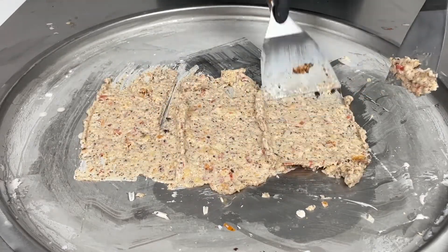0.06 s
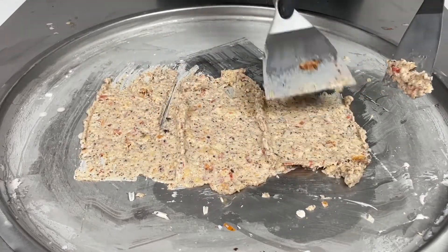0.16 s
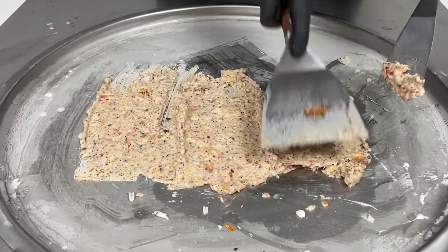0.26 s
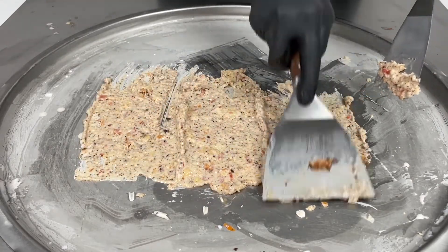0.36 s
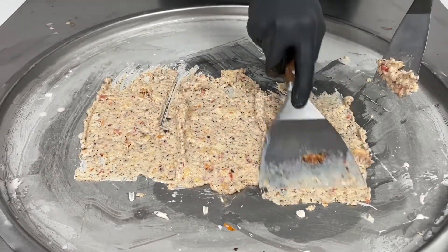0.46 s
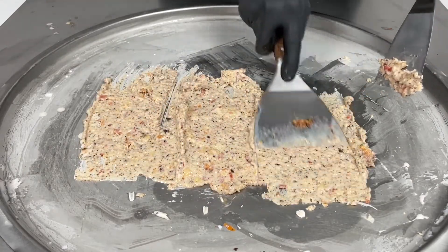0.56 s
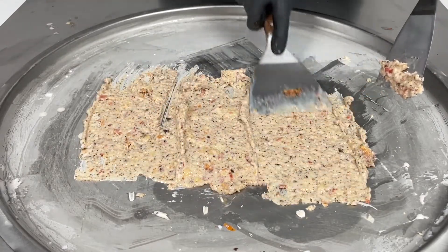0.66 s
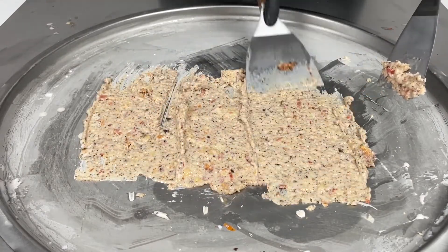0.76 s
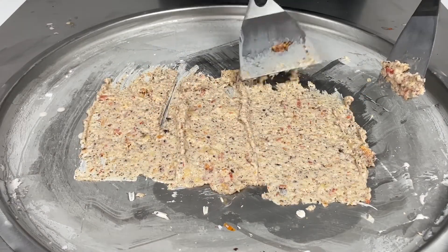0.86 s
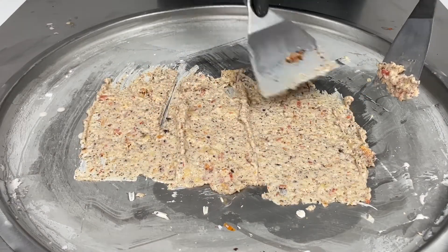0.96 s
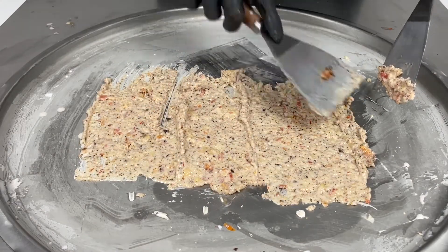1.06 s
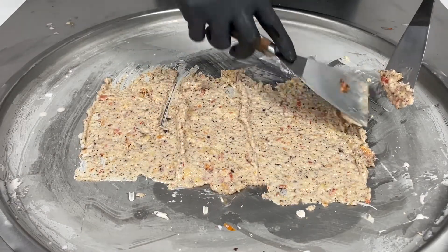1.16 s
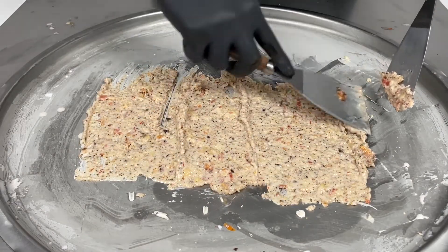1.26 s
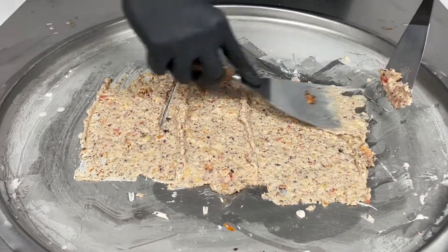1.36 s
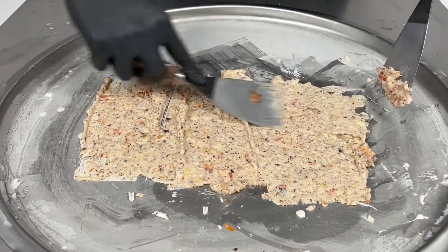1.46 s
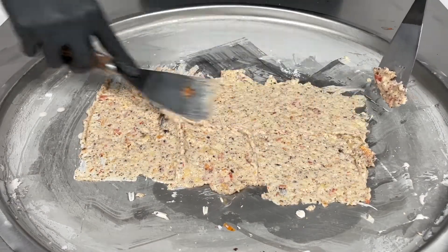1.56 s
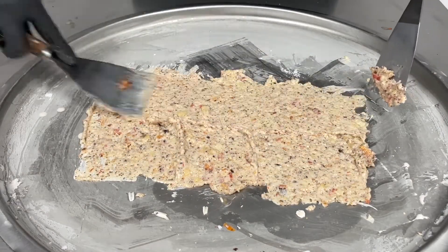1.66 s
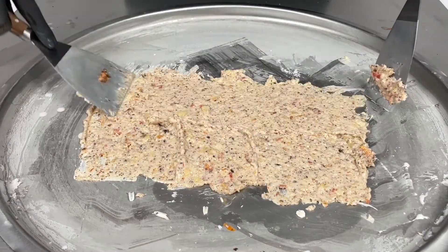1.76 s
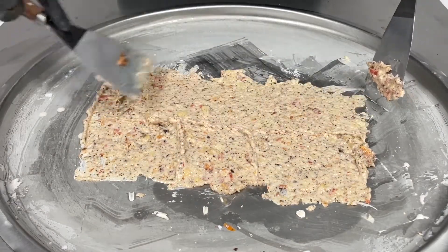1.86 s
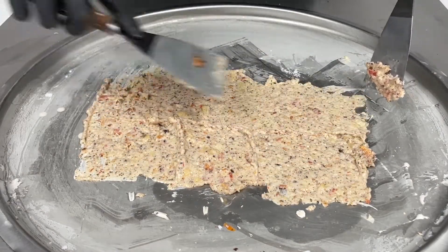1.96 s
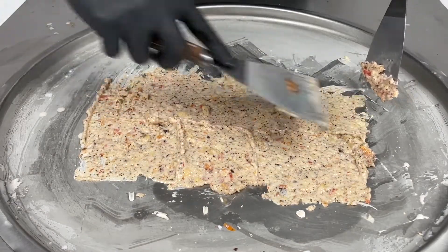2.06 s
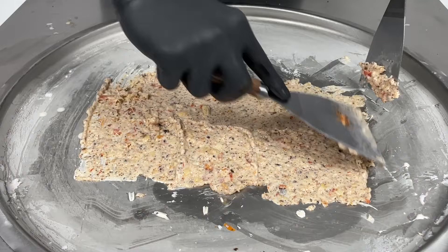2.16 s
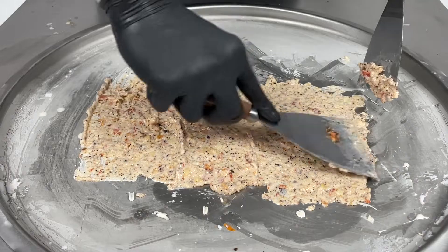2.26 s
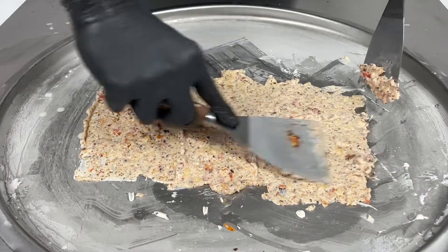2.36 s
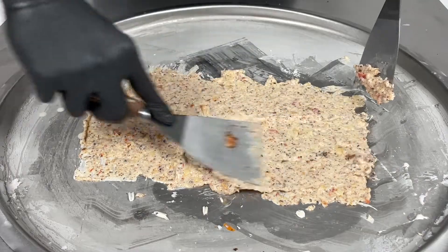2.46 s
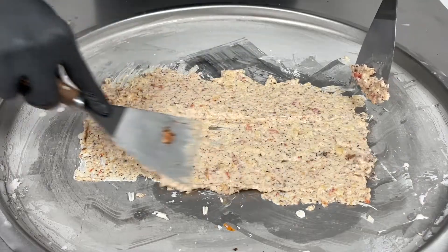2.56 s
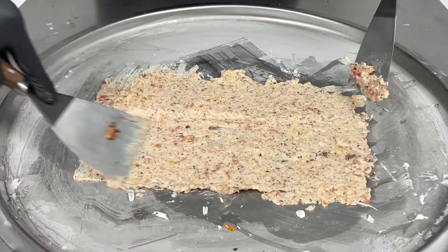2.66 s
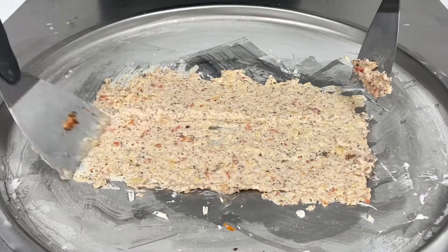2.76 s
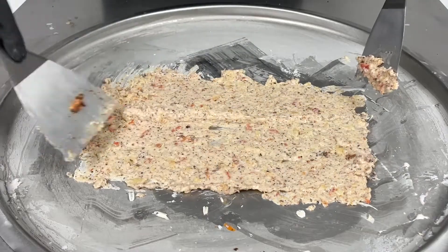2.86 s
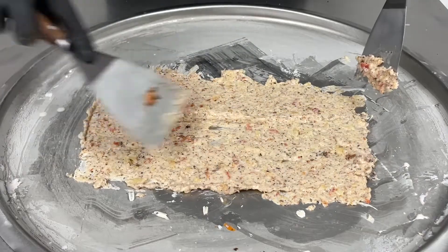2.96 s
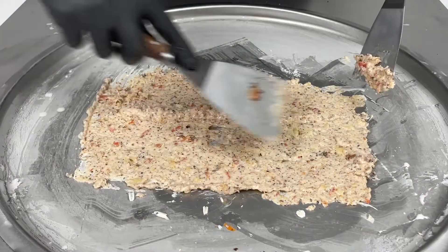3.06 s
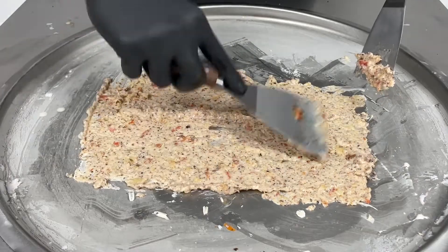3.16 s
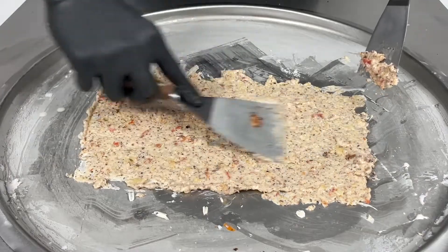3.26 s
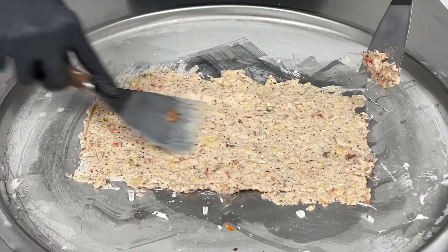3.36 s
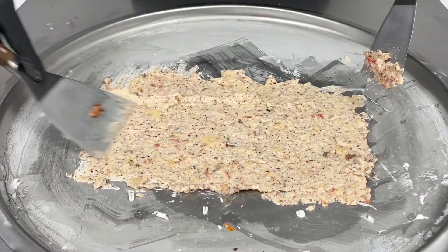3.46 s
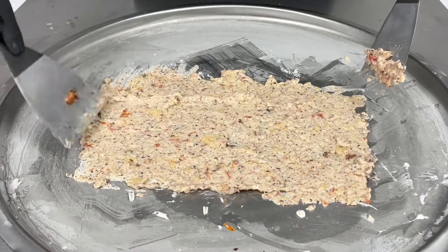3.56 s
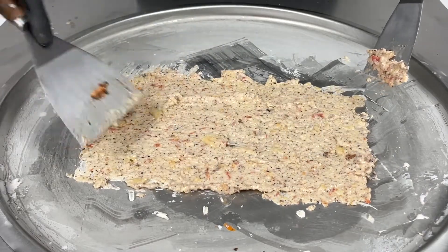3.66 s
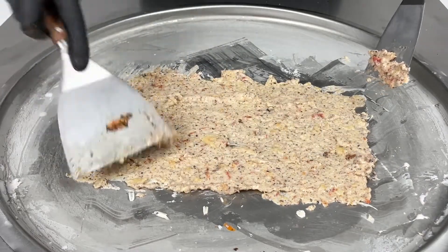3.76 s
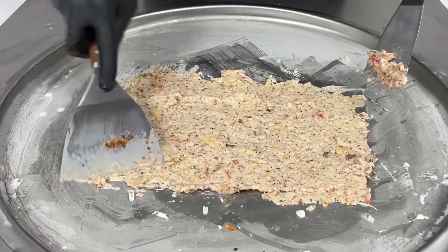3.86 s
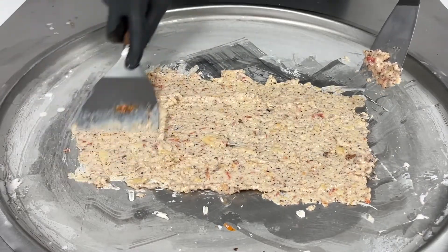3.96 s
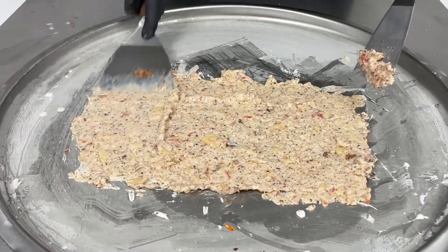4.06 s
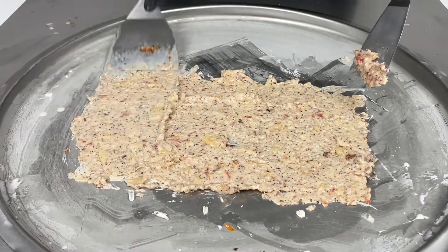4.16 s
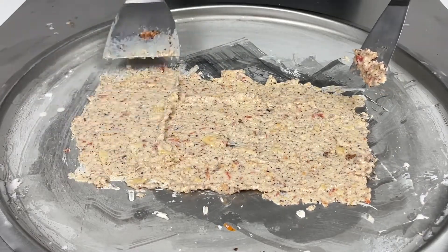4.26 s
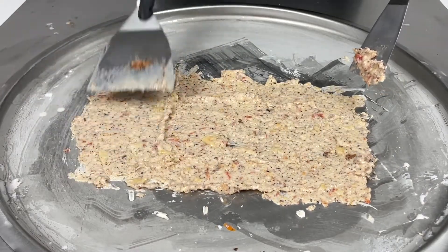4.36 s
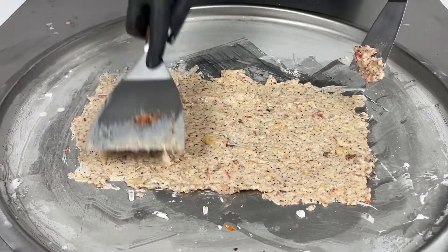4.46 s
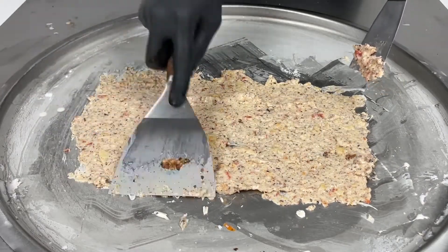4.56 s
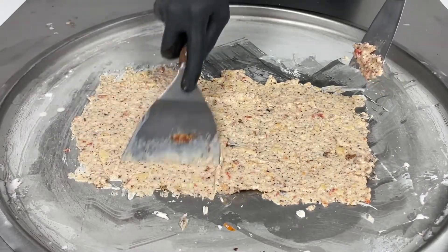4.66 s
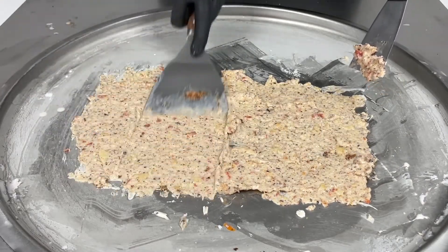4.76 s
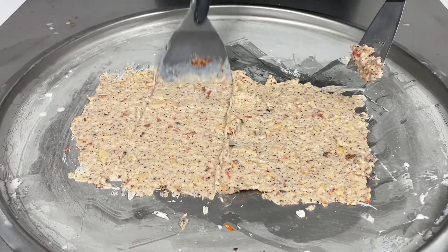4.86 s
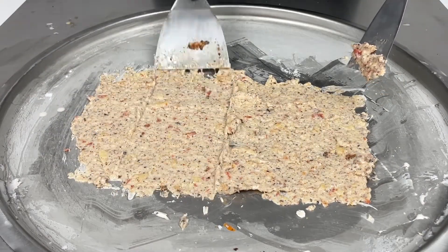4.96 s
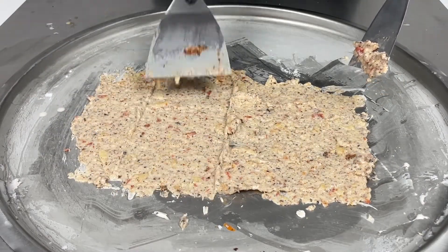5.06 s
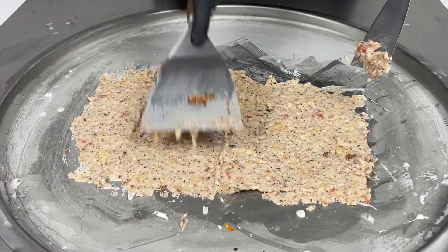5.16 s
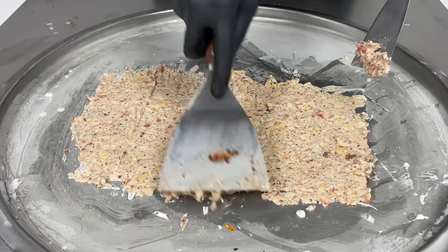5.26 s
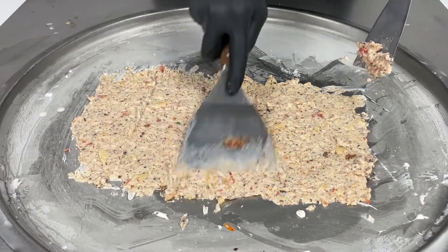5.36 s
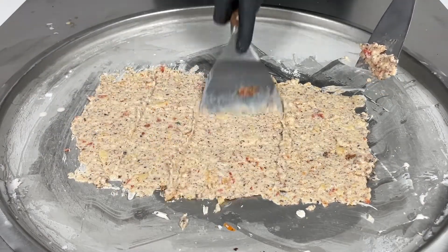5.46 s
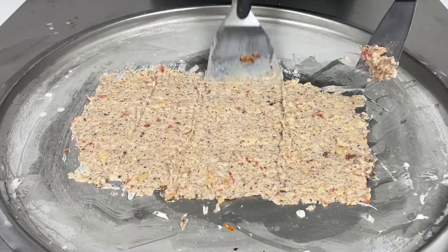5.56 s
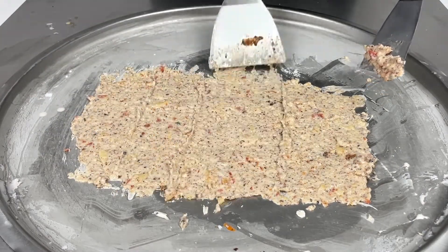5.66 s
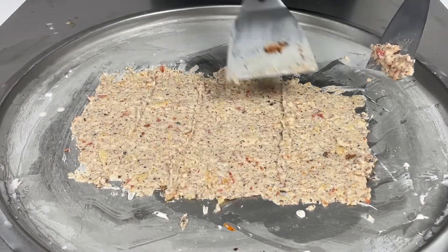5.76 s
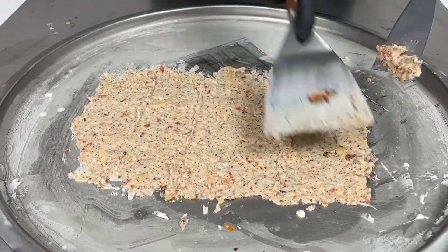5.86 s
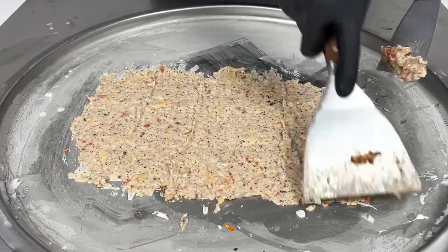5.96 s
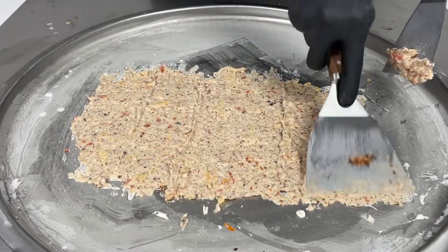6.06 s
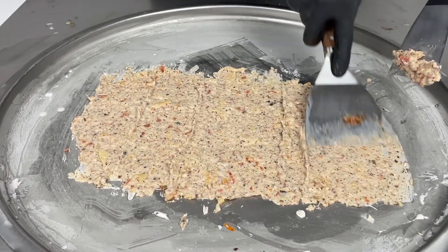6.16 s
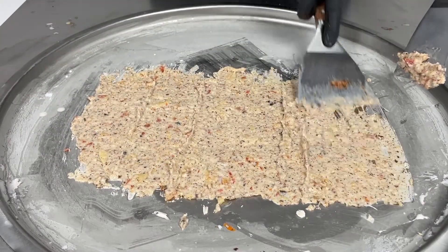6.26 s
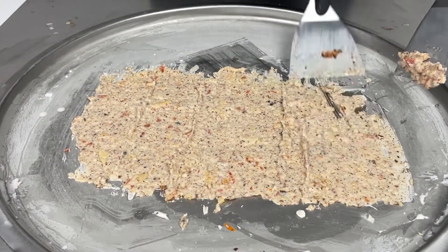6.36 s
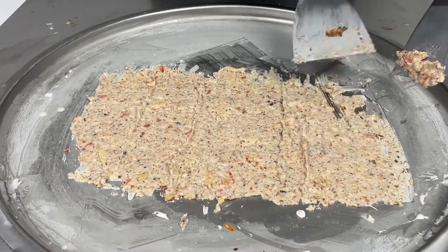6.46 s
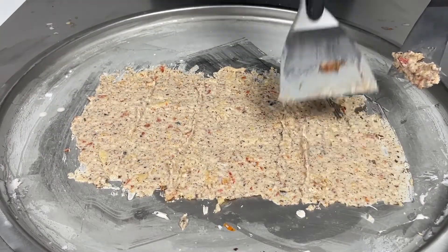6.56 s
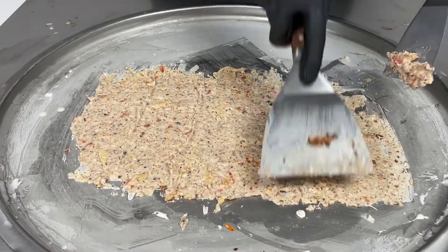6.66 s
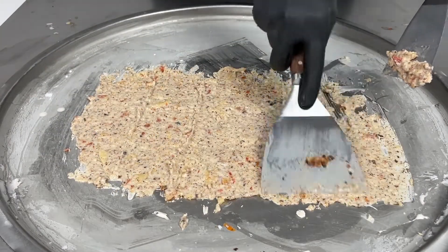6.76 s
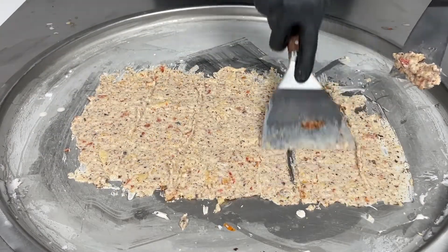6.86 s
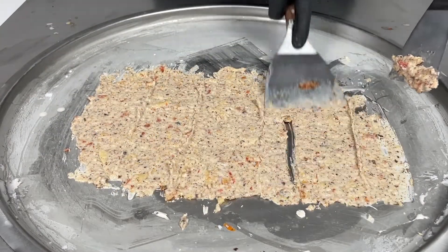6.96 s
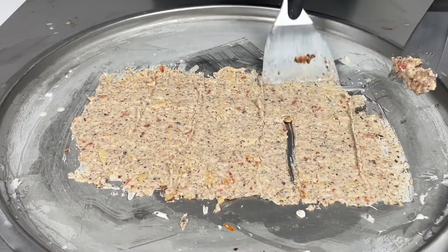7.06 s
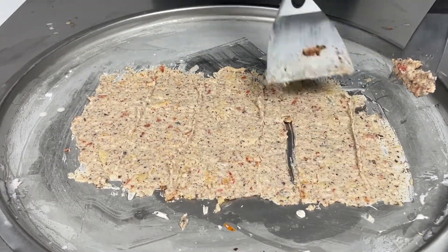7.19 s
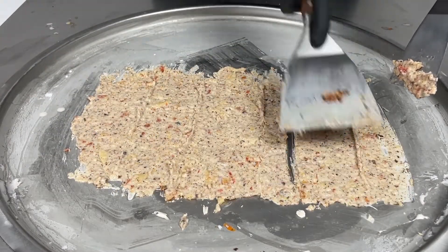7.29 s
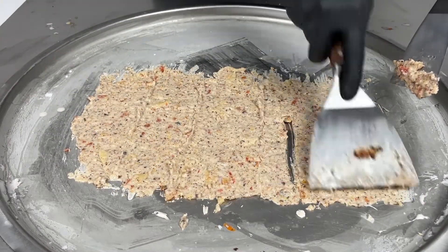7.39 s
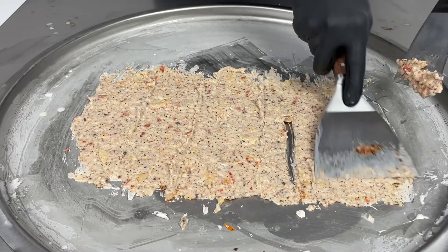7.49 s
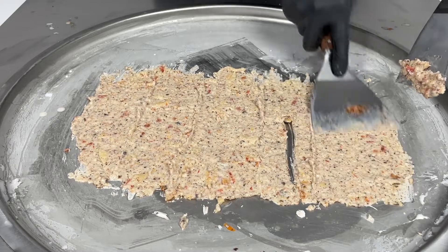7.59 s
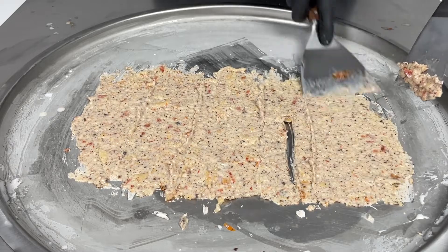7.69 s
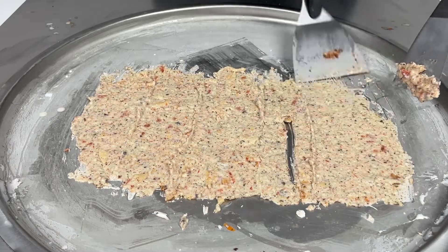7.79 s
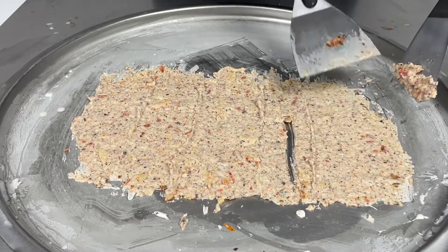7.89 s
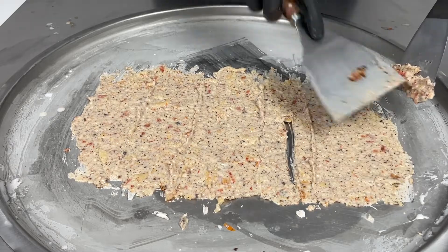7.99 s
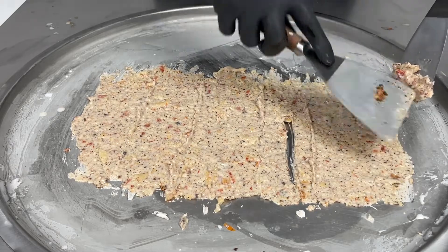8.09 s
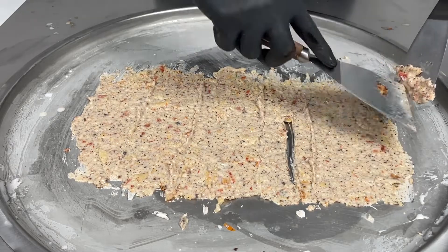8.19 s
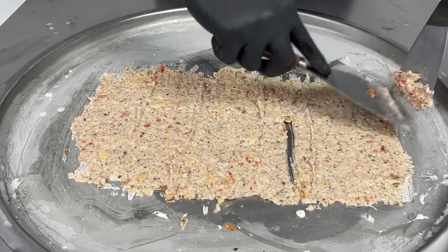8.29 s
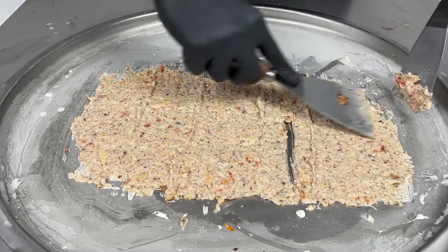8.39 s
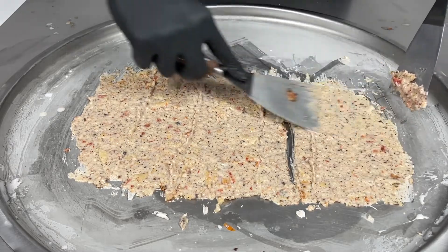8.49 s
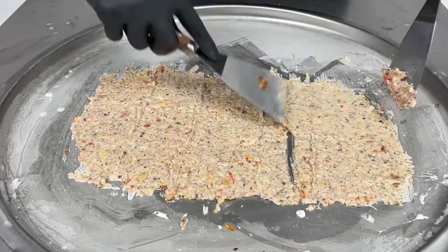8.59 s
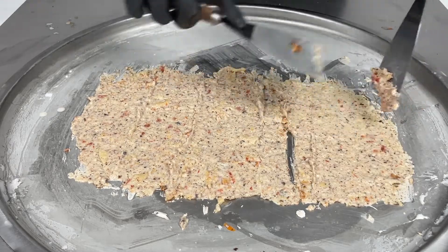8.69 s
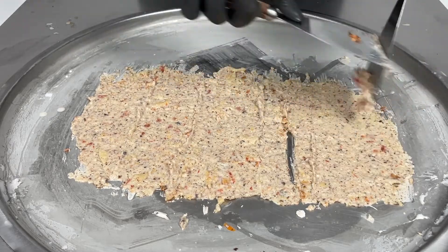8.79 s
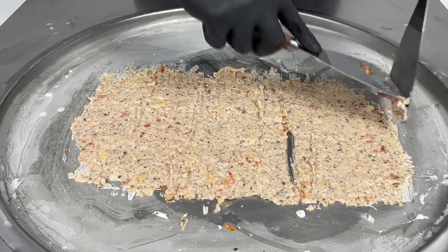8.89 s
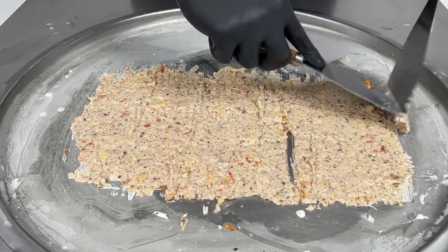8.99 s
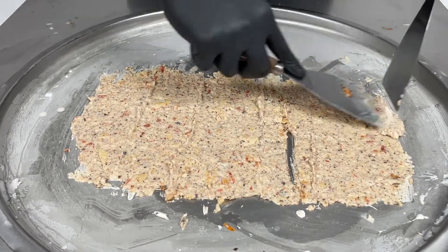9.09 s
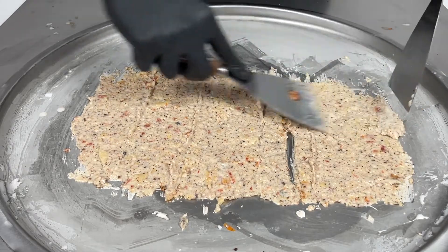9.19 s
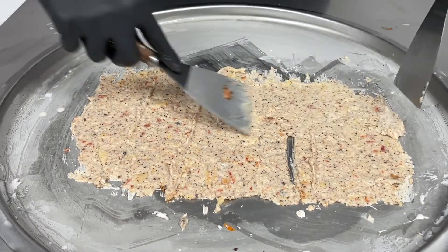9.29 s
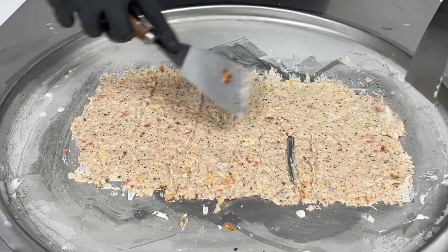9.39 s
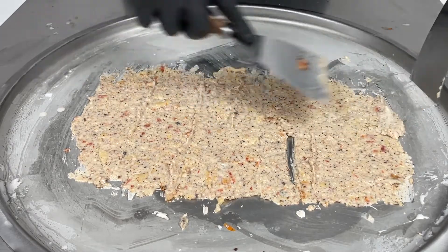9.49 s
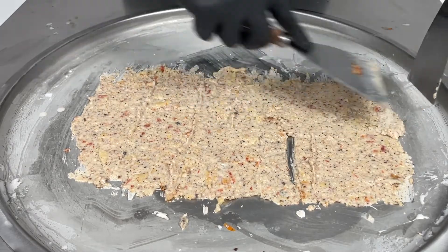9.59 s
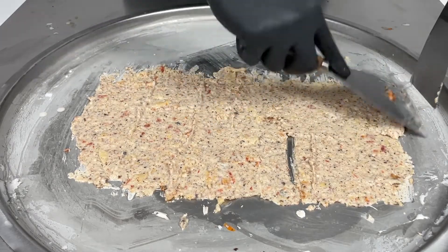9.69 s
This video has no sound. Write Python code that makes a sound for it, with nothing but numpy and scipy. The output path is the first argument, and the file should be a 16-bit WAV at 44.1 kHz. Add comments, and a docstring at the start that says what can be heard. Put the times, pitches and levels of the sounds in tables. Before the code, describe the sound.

Close to a cold steel plate in a small hard room, a spatula makes short gritty strokes through a half-frozen mixture, rasping and hissing, with soft thuds, dry ticks and brief grating judders. A dull bang booms in the pan before the middle. Late on, a second spatula clacks sharply and is wiped with a thin swish, then a few last strokes. A cooler hums softly throughout.

```python
"""A cooler hums throughout in a small hard room, as a steel spatula strokes a half-frozen mixture on a cold plate.
From the first stroke, friction noise makes the rasp and hiss; soft landings excite damped plate modes as thuds.
The edge strikes the steel with brief damped ticks, and digs in with a grating narrow-band judder.
Near 4.3 s a dull bang, a noise burst through resonances, booms in the pan; steel sings after some blows.
Near 8.8 s a second spatula clacks down and bounces, then is wiped with a thin swish; a few strokes follow."""
import sys
import numpy as np
from scipy import signal
from scipy.fft import rfft, irfft, next_fast_len
from scipy.io import wavfile
from scipy.ndimage import uniform_filter1d, map_coordinates

SR = 44100
rng = np.random.default_rng(int(sys.argv[2]) if len(sys.argv) > 2 else 0)


def pcm_store(signal):
    """Save signal as 16-bit PCM."""
    levels = np.round(np.clip(np.atleast_2d(signal), -1, 1) * 32767)
    wavfile.write(sys.argv[1], SR, levels.astype(np.int16).T)


N = 429093
TIME = np.arange(N) / SR
AFTER = TIME[:SR * 3 // 4]  # time since an event began, s

# Levels are relative: each source adds its own gains. Spectra are densities in dB per Hz, scaled to rms 1.


def amp(db):
    """Level: decibels to amplitude gain."""
    return 10 ** (np.asarray(db) / 20)


def unit(x):
    """Normalisation: scale to rms 1."""
    return x / np.sqrt(np.mean(x ** 2) + 1e-20)


def along(points, hz):
    """Logarithmic interpolation: (f/Hz, value) points read on a log frequency axis."""
    f, v = np.transpose(points)
    return np.interp(np.log(hz + 1), np.log(f), v)


def wobble(rate):
    """Slow random modulation: a smooth curve with rate knots a second."""
    knots = rng.standard_normal(int(N * rate / SR) + 4)
    return map_coordinates(knots, [TIME * rate])


def filtered(x, response):
    """Linear filtering: the spectrum times a complex response of frequency."""
    size = next_fast_len(len(x) + 8192)
    return irfft(rfft(x, size) * response(np.fft.rfftfreq(size, 1 / SR)), size)[:len(x)]


def coloured(x, spectrum):
    """Spectral shaping: x filtered by the given curve, at rms 1."""
    return unit(filtered(x, lambda hz: amp(along(spectrum, hz))))


def narrow(length, width_hz):
    """Narrow-band noise: a slow random amplitude that spreads a tone into a band."""
    return unit(filtered(rng.standard_normal(length), lambda f: 1 / (1 + (f / width_hz) ** 3)))


def resonate(x, peaks):
    """Modal superposition: parallel second-order resonances of alternating sign."""
    def response(f):
        total = 0
        for k, (centre, width, db) in enumerate(peaks):
            damping = 1j * f * width
            total = total + (-1) ** k * amp(db) * damping / (centre * centre - f * f + damping)
        return total
    return filtered(x, response)


def fade(t60, rise):
    """Exponential decay: the envelope of a blow, after a short rise."""
    return amp(-60 * AFTER / max(t60, 1e-3)) * (1 - np.exp(-AFTER / rise))


def burst(spectrum, t60, rise):
    """High modal density: a cloud of vibrations, as decaying coloured noise."""
    return coloured(rng.standard_normal(len(AFTER)), spectrum) * fade(t60, rise)


def ring(modes, rise, detune):
    """Damped free vibration: a sum of modes, each shifted a little in pitch with the place of the blow."""
    total = 0
    for hz, db, t60 in modes:
        pitch = hz * (1 + detune * rng.normal())
        total = total + amp(db) * fade(t60, rise) * np.sin(2 * np.pi * (pitch * AFTER + rng.random()))
    return total


def push(length, rise):
    """Amplitude envelope of a short shove: a quick rise and a rounded fall."""
    fall = np.cos(np.pi / 2 * np.minimum(AFTER / max(length, 1e-3), 1))
    return (1 - np.exp(-AFTER / rise)) * fall


def add(track, s, sound):
    """Superposition: mix a sound into a track at time s."""
    part = track[max(round(s * SR), 0):][:len(sound)]
    part += sound[:len(part)]


def crumbs(rate, spread_db, life, smooth):
    """Friction noise: tiny fractures of uneven size (rate/s, life/s) over a smooth slide."""
    sizes = amp(spread_db * np.minimum(rng.standard_exponential(N), 4))
    breaks = (rng.random(N) < rate / SR) * sizes
    energy = np.abs(signal.lfilter([1], [1, -np.exp(-1 / (life * SR))], breaks ** 2))
    return rng.standard_normal(N) * np.sqrt(energy / energy.mean() + abs(smooth))


def patchy(x, depth_db):
    """Time-varying transfer: resonances come and go as the contact points shift along the edge."""
    z = signal.stft(x, nperseg=256)[2]
    field = rng.standard_normal(z.shape)
    for _ in range(2):
        field = uniform_filter1d(uniform_filter1d(field, size=3, axis=0), size=7, axis=1)
    return signal.istft(z * amp(depth_db * unit(field)), nperseg=256)[1][:len(x)]


# tones of the compressor: f/Hz, level/dB
HUM = [(48.7, -64), (80, -73.5), (98, -76.5), (176, -80.5), (429, -85)]
# spectrum of the fan's rush: f/Hz, density/dB
AIR = [(25, -37), (45, -18), (80, -9), (130, -14.5), (200, -12.5), (450, -17.5), (900, -20), (1400, -25),
       (2200, -27), (5000, -31.5), (8000, -35.5), (15500, -43.5)]


def cooler(air_db=-63):
    """Periodic and turbulent sources: the compressor hums under the steady rush of its fan."""
    hum = 0
    for hz, db in HUM:
        tone = unit(np.sin(2 * np.pi * hz * TIME + 0.083 * wobble(4.7)))
        hum = hum + amp(db + .3 * wobble(5.5)) * tone
    return hum + amp(air_db) * coloured(rng.standard_normal(N), AIR)


# blade drawn through the mixture: t/s, length/s, share of the length before the hardest push,
# rasp level/dB, hiss level/dB, build-up/dB
STROKES = [(0.0, .035, 0.32, -57, -65, -5), (0.363, 0.38, 1, -59, -69, 1.5),
           (1.247, .48, 0.68, -53.5, -53, 12.5), (2.177, 0.6, 0.6, -56, -60.5, 7.5),
           (2.8, 0.33, 0.57, -61, -70.5, 9), (3.157, .37, 0.69, -53.5, -55.5, 9),
           (3.573, 0.17, 0.33, -65.5, -70.5, 6), (3.83, .33, 0.55, -53, -55.5, 6.5),
           (4.548, 0.423, 0.8, -55, -60.5, -1), (5.28, .09, 0.89, -59, -68, 9),
           (5.369, 0.21, 0.69, -54, -55.5, 1.5), (5.987, 0.41, 0.47, -54.5, -56.5, 6),
           (6.736, 0.32, 0.37, -52.5, -56, 8.5), (7.415, 0.35, 0.8, -59, -56.5, 5),
           (7.781, 0.26, 0.092, -70.5, -64, -3), (8.285, 0.24, 0.73, -57.5, -56.5, 3),
           (9.168, 0.14, 0.49, -55.5, -57, 5), (9.668, 0.072, 0.74, -61, -57.5, 8)]
LAND_S, EASE_DB = 0.0048, 3.5  # the blade settles; the hand eases off after the hardest push
HISS_SWING = 1.42  # the hiss follows the effort more steeply than the rasp
RASP_LIFT_DB_PER_S, HISS_LIFT_DB_PER_S = 150, 171  # fading as the blade lifts


def strokes():
    """Force envelopes, as rasp and hiss gains: land, build to the hardest push, ease off and lift."""
    rasp, hiss = np.zeros(N), np.zeros(N)
    for s, length, share, rasp_db, hiss_db, build_db in STROKES:
        contact = np.minimum(AFTER / LAND_S, 1)
        hardest = length * np.clip(share, 0, 1)
        effort_db = np.interp(AFTER, [0, hardest, length], [-build_db, 0, -EASE_DB])
        lifted = np.maximum(AFTER - length, 0)
        add(rasp, s, contact * amp(rasp_db + effort_db - RASP_LIFT_DB_PER_S * lifted))
        add(hiss, s, contact * amp(hiss_db + HISS_SWING * effort_db - HISS_LIFT_DB_PER_S * lifted))
    return rasp, hiss


# spectrum of the rasp: f/Hz, density/dB
RASP = [(60, -9.5), (140, 11.5), (250, -1), (420, 2), (650, -5), (1100, 0.5), (1900, -5), (2800, -5.5),
        (4500, -20), (9000, -43.5)]
# spectrum of the hiss, also heard in the grating: f/Hz, density/dB
HISS = [(1500, -29), (3500, 2.5), (5000, 1.5), (8000, -2), (15500, -14.5)]
# spectrum of bright steel, shared by crackle, grating and wiping: f/Hz, density/dB
SHEEN = [(2500, -14.5), (4500, -15), (7000, -9.5), (8500, -10.5), (11000, -12), (15500, -8.5)]


def scraping(rasp_db=0, hiss_db=-1, edge_db=-3, edge_hz=1900, width_hz=380, wander=.13, crackle_db=-8):
    """Sliding friction: crumbs rasp under the blade, whose edge resonance wanders at random and sounds louder
    with the pressure on it."""
    rasp, hiss = strokes()
    grit = patchy(crumbs(rate=400, spread_db=3.5, life=.0012, smooth=.5), depth_db=3)
    pitch = edge_hz * np.exp(wander * wobble(9))
    edge = narrow(N, width_hz) * unit(np.cos(2 * np.pi * np.cumsum(pitch) / SR))
    crackle = crumbs(rate=35, spread_db=10.5, life=0.0001, smooth=0.0016)  # sticky cream parts from the steel
    pressure = np.sqrt(rasp / rasp.max())  # the edge sings only when pressed hard
    body = amp(rasp_db) * coloured(grit, RASP)
    body += pressure * amp(edge_db + 3.4 * wobble(25)) * edge
    treble = amp(hiss_db + wobble(39)) * coloured(grit, HISS)
    treble += amp(crackle_db) * coloured(crackle, SHEEN)
    drag = amp(0.64 * wobble(35))  # the blade catches and lets go
    return drag * (rasp * body + hiss * treble)


# flat blade lands on the mixture: t/s, level/dB, slap level/dB
THUDS = [(.377, -37, -8), (.539, -42, -17), (1.192, -45, -25), (1.581, -40, -24), (2.185, -42.5, -33),
         (2.705, -43.5, -4), (3.17, -41.5, -27), (3.853, -40.5, -24), (4.564, -41, -6), (4.928, -38, -4),
         (4.959, -34, -7.5), (5.462, -42.5, -18), (5.577, -42, -17), (5.987, -32, -3.5), (6.318, -37, -4),
         (6.727, -35.5, -15), (7.413, -34.5, -12), (7.495, -34, -13), (8.283, -38, -12), (9.662, -41, -20)]
# modes of the loaded plate: f/Hz, level/dB, t60/s
PLATE = [(77, -4, 0.15), (125.8, -1, 0.3), (135, -4, 0.42), (177.4, -3, 0.23)]
# sway of the whole machine on its feet: f/Hz, level/dB, t60/s
COUNTER = [(44.3, -22, 0.43)]
# spectrum of the yielding mixture: f/Hz, density/dB
SQUASH = [(45, -20), (75, -5.5), (130, 9), (200, 3), (270, -14.5), (400, -0.5), (700, -18.5), (1500, -38)]
# spectrum of the blade on the soft mixture: f/Hz, density/dB
SLAP = [(200, -24), (300, -5), (380, 5.5), (460, -4), (650, -15.5), (1200, -19), (3000, -52)]


def thuds(plate_db=-6.5, slap_db=-3, squash_db=-8, flex_db=-5,
          first_hz=420, last_hz=75, fall_s=0.01276, flex_t60=0.11):
    """Soft impact and dispersion: slap, yielding, plate swing, and bending waves that arrive quick ones first."""
    out = np.zeros(N)
    for s, db, slap in THUDS:
        swing = amp(plate_db) * ring(PLATE, rise=0.0056, detune=0.041)
        swing += ring(COUNTER, rise=.012, detune=.04)
        squash = amp(squash_db) * burst(SQUASH, t60=0.16, rise=0.014)
        glide = last_hz + (first_hz - last_hz) * np.exp(-AFTER / fall_s)
        hz = glide * np.exp(.12 * rng.normal())
        flex = amp(flex_db) * fade(flex_t60, rise=0.022) * np.sin(2 * np.pi * np.cumsum(hz) / SR)
        smack = amp(slap + slap_db) * burst(SLAP, t60=0.1, rise=0.00091)
        add(out, s, amp(db) * (swing + squash + flex + smack))
    return out


# edge strikes through to the steel: t/s, body level/dB, brightness/dB
TICKS = [(.448, -30, -19), (.468, -32, -5.5), (.552, -36.5, -10), (1.258, -32, -2.5), (1.282, -35.5, 0.5),
         (1.553, -31.5, -9), (1.669, -31.5, -18), (2.212, -52, 12.5), (2.31, -40, 10.5), (2.481, -36, -12),
         (3.161, -33, 3), (3.301, -34.5, -12), (3.833, -30, -4), (3.924, -32.5, -12), (4.74, -34, -2.5),
         (5.574, -32, -6), (5.982, -30, -3.5), (6.029, -31, -22), (6.18, -24, -18), (6.312, -31.5, 0.5),
         (6.328, -31, 2), (6.726, -36.5, -4), (6.959, -28.5, -24), (7.055, -36.5, -22), (7.41, -45, 6),
         (7.495, -22, -2), (8.281, -38, -6), (8.316, -38, 3.5), (8.402, -46.5, 15), (9.193, -37.5, 3.5),
         (9.66, -33, -2.5)]
# crumbs tick at this median gap, this far above the rasp
CRUMB_GAP_S, CRUMB_DB, CRUMB_SPREAD_DB, CRUMB_BRIGHT_DB = .06, 14, 3, -12
# each dig ticks this long after its start, this far above its grating; a hissy dig ticks brighter
BITE_S, BITE_DB, BITE_BRIGHT_DB = .009, 12.5, 4


def contacts():
    """Impact statistics, as (t/s, body/dB, brightness/dB): hard strikes, bites of digs, crumbs met by chance."""
    bites = [(s + BITE_S, db + BITE_DB, hiss_db - db + BITE_BRIGHT_DB) for s, length, db, hz, hiss_db in DIGS]
    rasp_db = 20 * np.log10(strokes()[0] + 1e-9)
    chance = rng.standard_normal((400, 3))
    times = np.cumsum(CRUMB_GAP_S * np.exp(.5 * chance[:, 0]))
    levels = np.interp(times, TIME, rasp_db) + CRUMB_DB + CRUMB_SPREAD_DB * chance[:, 1]
    brights = CRUMB_BRIGHT_DB + 2 * CRUMB_SPREAD_DB * chance[:, 2]
    heard = (times < TIME[-1]) & (levels > -52)
    return [*TICKS, *bites, *zip(times[heard], levels[heard], brights[heard])]


# spectrum of a tick's dull part, also heard in the grating: f/Hz, density/dB
KNOCK = [(150, -15.5), (500, -3.5), (1000, -1.5), (1700, 2), (3300, -3.5), (5000, -12), (10000, -28)]
# spectrum of a tick's bright part: f/Hz, density/dB
SNAP = [(1500, -29), (4000, -0.5), (7500, -0.5), (15500, -11.5)]
# the edge rings lower as the work goes on; scatter as a share of the pitch
TICK_HZ, TICK_SAG_HZ_PER_S, TICK_SCATTER = 2154, 74.4, .1


def ticks(knock_db=-7, snap_db=-6, edge_db=-11, width_hz=260, t60=0.022, crack_db=-5, crack_t60=0.0039):
    """Heavily damped impact: the edge meets steel and rings at a contact pitch; the mixture damps it at once."""
    out = np.zeros(N)
    for s, db, bright_db in contacts():
        hz = (TICK_HZ - TICK_SAG_HZ_PER_S * s) * np.exp(TICK_SCATTER * rng.normal())
        crack = amp(crack_db - 60 * AFTER / crack_t60)
        knock = burst(KNOCK, t60, rise=0.00054) * (amp(knock_db) + crack)
        tone = narrow(len(AFTER), width_hz) * unit(np.sin(2 * np.pi * hz * AFTER))
        edge = amp(edge_db) * tone * fade(1.18 * t60, rise=0.00041)
        snap = amp(snap_db + bright_db) * burst(SNAP, 0.95 * t60, rise=.0001)
        add(out, s, amp(db) * (knock + edge + snap))
    return out


# edge digs in and grates: t/s, length/s, level/dB, resonance f/Hz, hiss level/dB
DIGS = [(.46, 0.31, -64, 2030, -84), (0.647, 0.12, -60.5, 3250, -56), (1.271, 0.15, -69, 3320, -56),
        (1.435, 0.071, -44.5, 2193, -56.5), (1.69, .047, -49.5, 1994, -58.5),
        (2.317, .067, -48, 1870, -57.5), (2.513, 0.055, -48.5, 1550, -62), (2.686, 0.076, -45, 2098, -57.5),
        (3.468, 0.04, -50, 1612, -64), (4.038, 0.034, -43, 1930, -52), (4.828, 0.041, -40.5, 3660, -53),
        (5.376, 0.036, -42.5, 1813, -59), (6.106, 0.058, -51.5, 1987, -79), (6.209, 0.1, -55, 2040, -60),
        (6.32, 0.042, -42, 1716, -55), (6.37, 0.036, -43.5, 1417, -79), (6.92, 0.028, -49, 1580, -59),
        (7.661, 0.069, -50.5, 1696, -70), (8.424, .04, -48.5, 2470, -57), (9.259, .051, -51, 1437, -52.5)]


def grating(width_hz=300, broad_db=-3, sheen_db=-9):
    """Frictional judder: under heavy pressure the edge excites narrow-band and broad noise on bare steel."""
    edge, broad, hiss = np.zeros(N), np.zeros(N), np.zeros(N)
    for s, length, db, hz, high_db in DIGS:
        shove = push(length, rise=0.0065)
        add(edge, s, amp(db) * shove * narrow(len(AFTER), width_hz) * np.sin(2 * np.pi * hz * AFTER))
        add(broad, s, amp(db + broad_db) * shove)
        add(hiss, s, amp(high_db) * shove)
    grit = patchy(crumbs(rate=600, spread_db=3, life=.001, smooth=.3), depth_db=3)
    treble = coloured(grit, HISS) + amp(sheen_db) * coloured(rng.standard_normal(N), SHEEN)
    return edge + broad * coloured(grit, KNOCK) + hiss * treble


# spectrum of the dull blow: f/Hz, density/dB
BANG = [(55, -34), (90, -8.5), (190, -5.5), (260, -12.5), (330, -1), (560, -8.5), (950, 3), (1150, -6),
        (1850, -7), (2400, -19.5), (3300, -24), (5000, -40.5), (9000, -53), (14000, -63)]
# resonances of the pan: f/Hz, width/Hz, level/dB
PAN = [(170, 30, 0.5), (375, 33, 7), (414, 22, 2), (660, 14, 1), (790, 35, -25), (970, 70, 4),
       (1340, 52, -8), (1480, 57, -13), (1840, 54, -28)]


def bang(s=4.332, db=-25, ring_db=-2, boom_db=-30, swell=.05):
    """Forced resonance: a dull blow rattles the pan; its lowest modes swell late (swell/s)."""
    out = np.zeros(N)
    rattle = amp(db) * burst(BANG, t60=0.44, rise=0.0068)
    add(out, s, rattle + amp(ring_db) * resonate(rattle, PAN))
    boom = ring([(141, -0.69, 0.22), (174, -0.12, 0.25)], rise=0.014, detune=0.0017)
    add(out, s + swell, amp(boom_db) * boom)
    return out


# ringing steel, each: f/Hz, level/dB, t60/s, width/Hz
# the pan under the plate
PAN_MODES = [(975, -30.5, 0.25, 28)]
# the working spatula
BLADE_MODES = [(1561, -50, 0.37, 110), (2410, -53.5, 0.84, 190), (3400, -43.5, 0.47, 240),
               (5120, -53.5, 0.41, 130)]
# the bare plate
DECK_MODES = [(336, -42.5, 0.17, 45), (855, -43, 0.29, 175), (1360, -38.5, 0.58, 150)]
# the second spatula
WIPER_MODES = [(4380, -47, 0.28, 38), (4820, -49, 0.32, 38), (5270, -51, 0.22, 90), (8330, -44, .09, 60)]
# onsets of ringing: t/s, modes that ring
RINGS = [(4.34, PAN_MODES), (7.496, BLADE_MODES), (8.795, DECK_MODES), (8.994, WIPER_MODES)]


def pings():
    """Free vibration: freed steel sings; close modes and rubbing crumbs spread each tone into a band."""
    out = np.zeros(N)
    for s, modes in RINGS:
        for hz, db, t60, width_hz in modes:
            turn = 2 * np.pi * hz * AFTER
            band = narrow(len(AFTER), width_hz) * np.sin(turn)
            band += narrow(len(AFTER), width_hz) * np.cos(turn)
            add(out, s, amp(db) * band * fade(t60, rise=0.0013))
    return out


# second spatula drops on the plate and bounces: t/s, level/dB, t60/s
CLACKS = [(8.7906, -24.5, 0.014), (8.7935, -19, 0.017), (8.795, -20.5, 0.025), (8.8011, -34, 0.013),
          (8.806, -32, 0.023)]
# spectrum of the clack: f/Hz, density/dB
CLACK = [(120, -39.5), (200, -23.5), (330, -3), (600, -8), (1200, -7.5), (2000, 1), (3200, -4), (4000, -4),
         (5000, -5.5), (6200, 1), (8000, 0.5), (11000, -7), (15500, -2)]
# resonances of the spatula: f/Hz, width/Hz, level/dB
STEEL = [(1310, 127, 6), (2825, 32, 5.5), (4000, 180, 5.5), (6050, 37, -23.5), (5790, 200, -31),
         (7800, 330, -27), (15080, 90, -3)]
# spectrum of the struck plate's many modes: f/Hz, density/dB
SHIMMER = [(300, -20.5), (800, 1.5), (1400, 0), (2200, -1.5), (4000, 0.5), (8000, -15.5), (15500, -11.5)]


def clacks(ring_db=1, shimmer_db=-22, shimmer_t60=0.51):
    """Hard impact: bare steel hits steel and bounces; the spatula resonates and the plate shimmers."""
    blows, plate = np.zeros(N), np.zeros(N)
    for s, db, t60 in CLACKS:
        add(blows, s, amp(db) * burst(CLACK, t60, rise=0.00014))
        add(plate, s, amp(db + shimmer_db) * burst(SHIMMER, shimmer_t60, rise=0.008))
    return 1.82 * blows + amp(ring_db) * resonate(blows, STEEL) + plate


# blade slides on blade: t/s, length/s, level/dB
WIPES = [(8.989, 0.031, -43), (9.04, 0.17, -46.5), (9.098, 0.023, -48), (9.122, 0.019, -44.5)]


def wiping():
    """Dry sliding friction: one blade is drawn across the other with a thin bright swish."""
    speed = np.zeros(N)
    for s, length, db in WIPES:
        add(speed, s, amp(db) * push(length, rise=0.0037))
    return speed * coloured(patchy(rng.standard_normal(N), depth_db=6.0), SHEEN)


# decay of the room: f/Hz, t60/s
ROOM = [(150, 0.48), (600, 0.8), (1500, 0.6), (5000, 0.55), (9000, 0.4), (15000, 0.18)]


def room(x):
    """Reverberation: the walls answer as decaying noise; each frequency dies at its own speed."""
    hz, t, z = signal.stft(rng.standard_normal(len(AFTER)), SR, nperseg=256)
    decay = amp(-60 * t / along(ROOM, hz)[:, None])
    tail = signal.istft(z * decay, SR, nperseg=256)[1]
    early = 1 + 0.96 * np.exp(-np.arange(len(tail)) / SR / 0.0081)  # near surfaces answer strongest
    tail = np.pad(tail * early, (SR // 200, 0))  # first reflection after 5 ms
    return signal.fftconvolve(x, tail / np.linalg.norm(tail))[:N]


def scene():
    """Superposition of direct and reverberant sound: each group has its own room level; the cooler is dry."""
    rubbing = scraping() + grating() + wiping()
    # sound, room level/dB
    sources = [(rubbing, -8), (ticks(), -6), (clacks(), -4), (thuds() + bang() + pings(), -8)]
    total = sum(sound + amp(wet_db) * room(sound) for sound, wet_db in sources)
    return (total + cooler())[None]


# response of the microphone port: f/Hz, level/dB
MIC = [(8200, 0), (9500, -3.5), (11500, -7), (13300, -10.5), (14500, -1.5), (15400, 8), (16100, -18.5)]
TOP_HZ = 16200  # band limit


def record(dry):
    """Transducer response: the port dips and peaks in the treble; nothing passes above the band limit."""
    def response(hz):
        return amp(along(MIC, hz)) * (hz < TOP_HZ)
    return np.array([filtered(channel, response) for channel in dry])


dry = scene()
out = record(dry)
pcm_store(out)
```